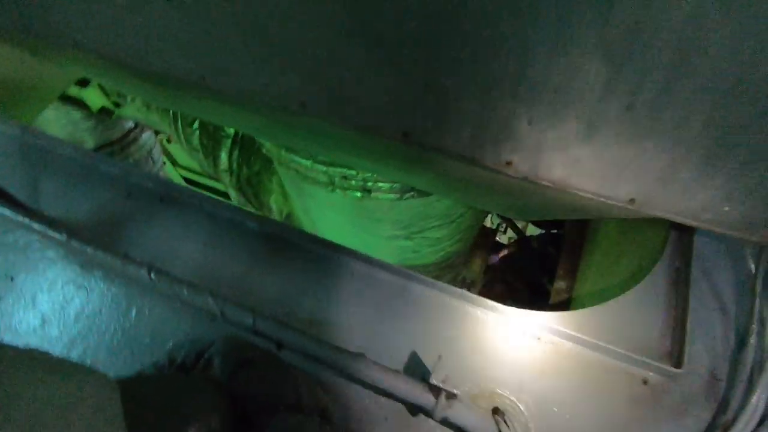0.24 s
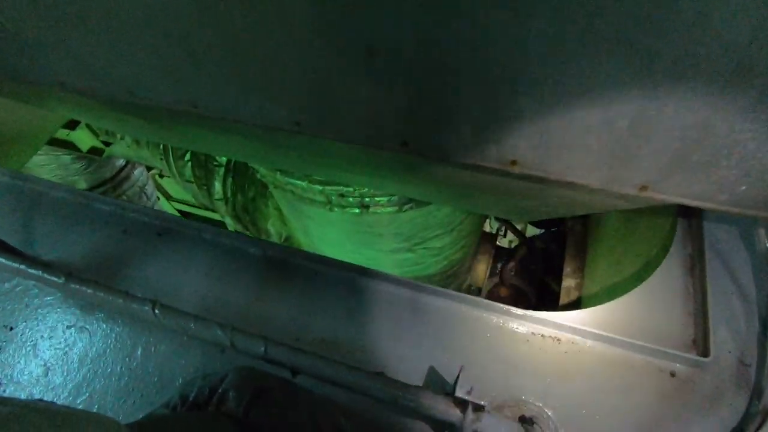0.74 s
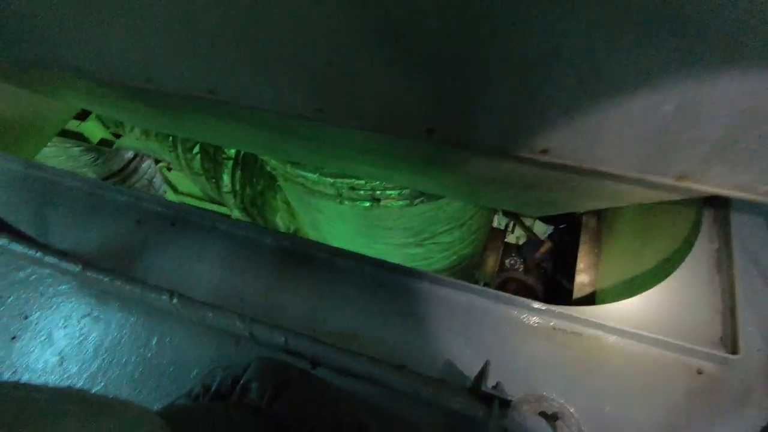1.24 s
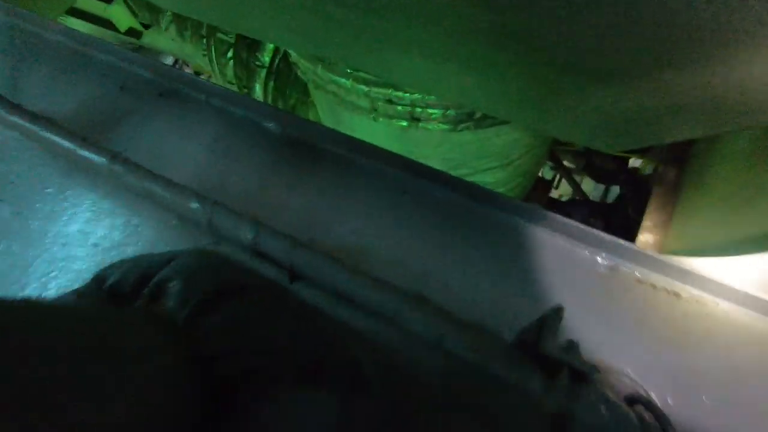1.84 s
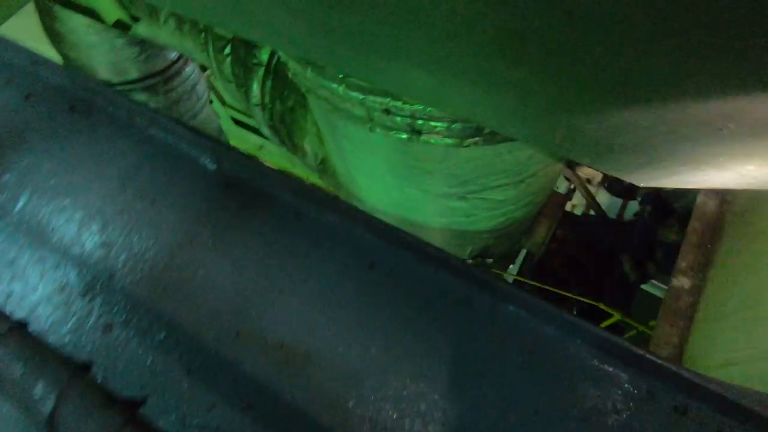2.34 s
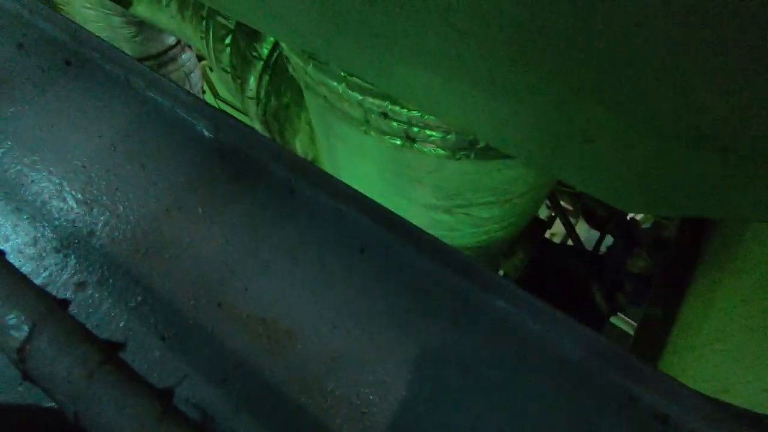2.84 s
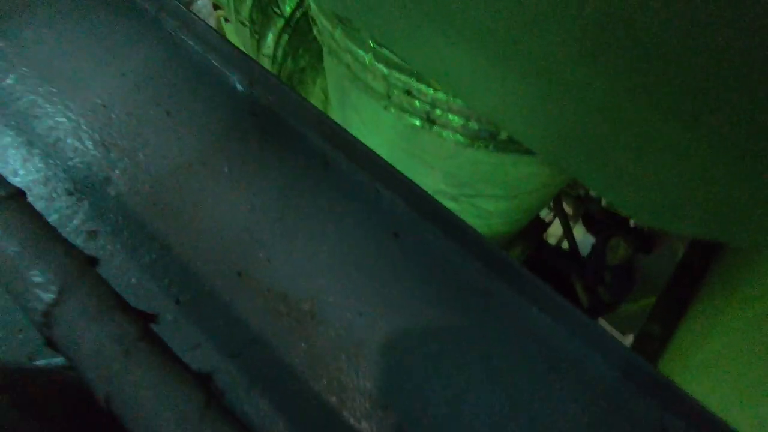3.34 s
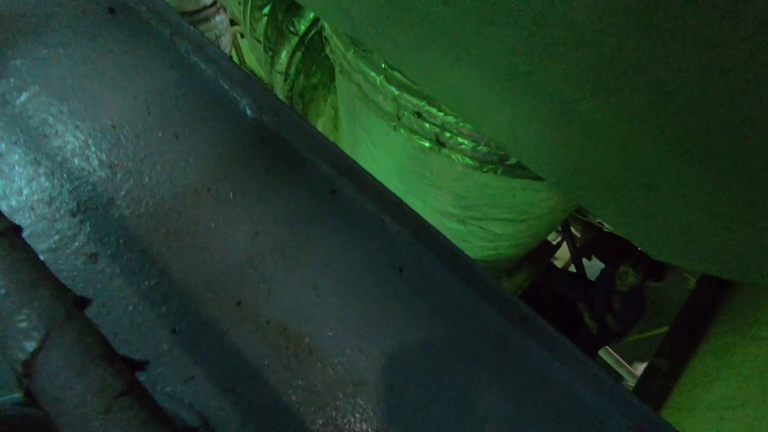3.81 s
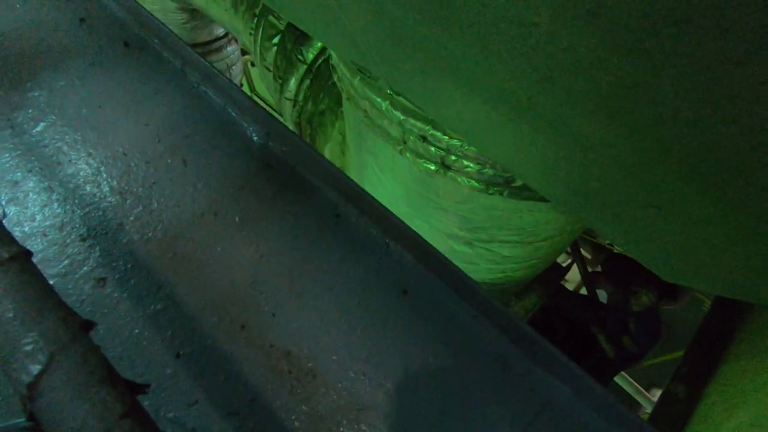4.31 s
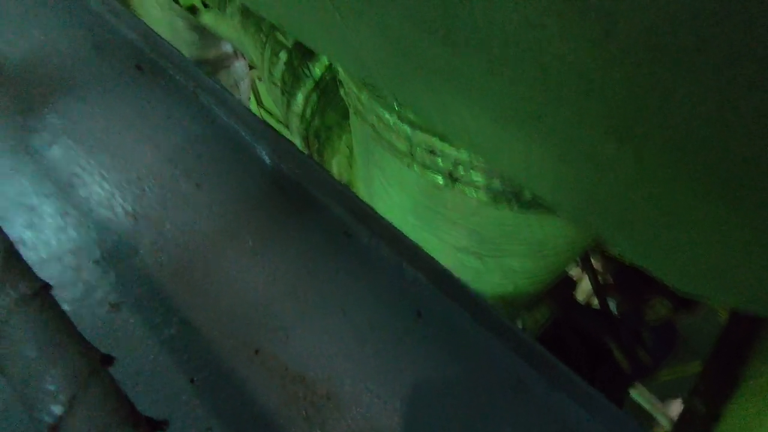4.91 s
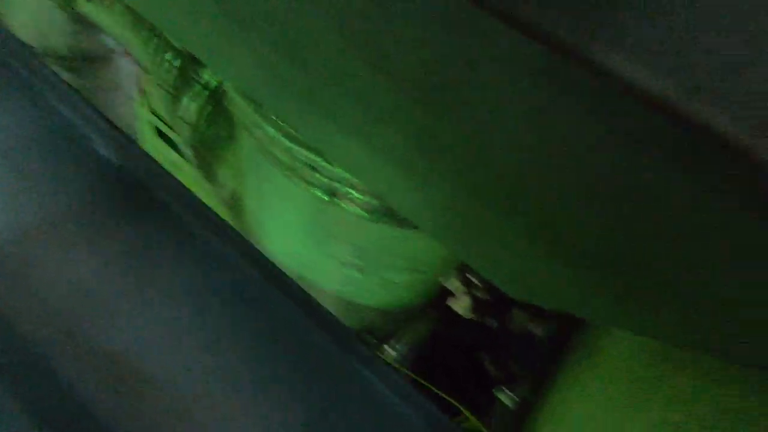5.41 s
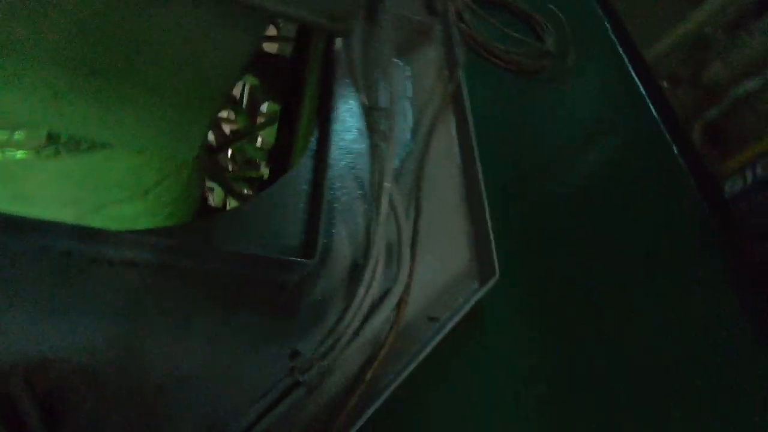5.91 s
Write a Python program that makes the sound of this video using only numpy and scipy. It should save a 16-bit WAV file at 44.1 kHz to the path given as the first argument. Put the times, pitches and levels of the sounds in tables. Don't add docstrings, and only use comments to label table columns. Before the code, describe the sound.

Loud continuous machinery roar and low throbbing hum, an electric whine coming and going, broken by small clicks at abrupt cuts.

```python
import sys
import numpy as np
from scipy import signal
from scipy.io import wavfile
from scipy.ndimage import uniform_filter1d

SR = 44100
rng = np.random.default_rng(int(sys.argv[2]) if len(sys.argv) > 2 else 0)


def nominal_scale(level):
    x = np.asarray(level, float) / 20
    return 10 ** x


def to_wav(s):
    ch = np.atleast_2d(s).T
    pcm = np.round(np.clip(ch, -1, 1) * 32767)
    wavfile.write(sys.argv[1], SR, pcm.astype(np.int16))


N = 271656

ENGINE_HZ, TWIN_LAG_HZ = 14.985, 0.15
SHAFT_HZ = 14.937
# order, level_db, twin_share, cancel_s
FIRING_PAIRS = [(3, -36.5, 0.8, 2.3), (4, -52.5, 3.2, 1.3), (6, -41.5, .9, 1.92), (12, -43.5, .7, 2.08)]
# order (multiple of the shaft speed), level_db
SHAFT_ORDERS = [(2, -53), (3.5, -51.5), (5, -54), (8.5, -44.5), (10.5, -48), (12.6, -47), (15, -48.5),
                (16, -49), (17, -50.5), (17.7, -50), (20, -55), (24, -51.5), (36, -56)]
PUMP_HZ = [316, 632.4, 1582.3, 1912, 2214, 2390, 2530, 3165, 3320]
# level_db, wander_db
PUMP_LEVELS = [(-49.5, 3), (-52.5, 2), (-62.5, 1), (-68.5, 2.5), (-69.5, 2), (-70.5, 2.5), (-72.5, 4.5),
               (-76.5, 1), (-70.5, -1.5)]
PUMP_FOLLOW = 2.2
# freq_hz, level_db (per Hz)
ROAR_SPECTRUM = [(12, -38), (20, -6.5), (53, -4), (126, -2), (200, -5.5), (408, -11.5), (484, -12.5),
                 (850, -18.5), (961, -18), (1030, -17.5), (1290, -22.5), (1570, -22), (3520, -33.5),
                 (6040, -39), (7000, -46.5), (9100, -70), (15400, -120)]
ROAR_DB = -32
# freq_hz, level_db (per Hz)
FIZZ_SPECTRUM = [(3500, -30), (6000, 1.5), (6500, 0), (8800, -19), (10500, -27.5), (11250, -34.5),
                 (11800, -22), (12400, -17), (13500, -15), (14000, -20.5), (14600, -14), (15200, -13.5),
                 (15700, -6), (15800, -35)]
FIZZ_DB, FIZZ_SHELTER_DB = -62, -5
# pitch_hz,
# level_db, offset_hz, partner_share, cancel_s
BOOM_PAIRS = [(119.5, -42, -2.3, .4, 2.0), (134.85, -37, -1.03, .55, 2.47)]
# nearest_order, pitch_hz
SPOT_TONES = [(7, 104.9), (13, 198.3)]

# time_s, sheltered (in the gap, 0-1), turned (to the motor, 0-1)
MIC_PATH = [(0, 0, 0.7), (.2, 0, 0.6), (.45, 0.1, 0), (.9, 0.1, 0), (1.35, 0.2, .3), (1.52, .35, 0.94),
            (1.85, .45, 0.9), (2.15, 0.7, 0.4), (2.9, 0.72, 0.2), (3.76, 1, 0.12), (5.88, 0.4, .8),
            (6.16, .1, 0.7)]
# order, start_s, rise_s, stay_s, level_db
LOUD_SPOTS = [(7, 1.95, .15, 5, -44), (7, 2.05, .15, 0.53, -46), (13, 0.23, .1, 0.39, -46),
              (13, 1.0, 0.13, .05, -40), (13, 2.226, 0.34, 0.37, -38.5), (13, 3.1, 0.13, .3, -42.5),
              (32, 1.6, 0.14, 2.0, -40), (32, 1.6, .12, .7, -51.5), (32, 5.95, .1, 1, -38),
              (40, 2.16, 0.36, 2, -50.5), (64, 0.044, .42, .1, -43.5), (64, 0.63, 0.14, 0.47, -51.5),
              (64, 1.66, 0.68, 0.31, -50), (64, 2.55, 0.74, 2, -45.5), (64, 5.8, .05, 0.062, -39.5),
              (64, 5.95, 0.19, 1, -45)]
LEAVE_S = 0.21
QUIET_DB = {7: -48, 13: -52, 32: -51.5, 40: -54.5, 64: -58.5}
TOP_AWAY_DB, TOP_TURN_DB, TOP_SHELTER_DB = -56.5, 10, -16
COLOUR_HZ = [350, 950, 1550, 4000]
SHELTER_DB = [-5, -1.5, -1, -2]
TURN_DB = [1.5, -3, 2, 1]
RISEN_DB = [-1.5, 3, 1, 0]
RISEN_S = 5.87
MIC_LOW_HZ = 38.4
# start_s, cut_s, source_s (taken from), fade_s, cut_height (wave height at the cut)
PIECES = [(0, 1.51639, 0, .0005, .022), (1.51639, 3.76639, 1.51639, .011, .028),
          (3.79639, 5.86639, 1.51639, .013, .047), (5.87639, 6.16, 5.87639, .003, .075)]


def engine():
    out = np.zeros(N)
    for order, db, share, cancel_s in FIRING_PAIRS:
        order = round(order)
        beating = beat(-order * TWIN_LAG_HZ, share, cancel_s)
        out += tone(order * ENGINE_HZ, db, 0.87, 0.36, 4.5, beating)
    for order, db in SHAFT_ORDERS:
        out += tone(order * SHAFT_HZ, db, 1.9, 0.5, 3.0)
    return out


def motor():
    sheltered, turned = curves(MIC_PATH, np.arange(N) / SR)
    top = nominal_scale(TOP_AWAY_DB + TOP_TURN_DB * turned + TOP_SHELTER_DB * sheltered)
    out = np.zeros(N)
    for order, height, flutter_db in [(32, heard(32), 0.51), (40, heard(40), 2.4),
                                      (64, heard(64), 1.8), (96, top, 1.1)]:
        out += tone(order * SHAFT_HZ, 0, flutter_db, 0.28, 16.0, height)
    return out


def pumps():
    bands = PUMP_FOLLOW * colour(np.arange(N) / SR)
    out = np.zeros(N)
    for hz, (db, wander_db) in zip(PUMP_HZ, PUMP_LEVELS):
        nearest = np.argmin(abs(np.log(hz / np.array(COLOUR_HZ))))
        out += tone(hz, db + bands[nearest], wander_db, 0.61, 4.0)
    return out


def deck():
    out = np.zeros(N)
    for hz, db, offset_hz, share, cancel_s in BOOM_PAIRS:
        out += tone(hz, db, 0.47, 0.44, 3.0, beat(offset_hz, share, cancel_s))
    for order, hz in SPOT_TONES:
        out += tone(hz, 0, 1.5, 0.37, 5.0, heard(order))
    return out


def roar():
    def field_db(t, hz):
        place = np.interp(np.log(hz + 1), np.log([150] + COLOUR_HZ), range(5))
        shares = np.clip(1 - abs(place[:, None] - np.arange(1, 5)), 0, 1)
        narrow = 0.88 * patches(t, hz, wide=3, long=40)
        broad = 0.5 * patches(t, hz, wide=25, long=10)
        return shares @ colour(t) + (narrow + broad) * np.clip(place, 0.3, 1)[:, None]
    swell = nominal_scale(ROAR_DB + 0.34 * drift(14.0))
    return swell * noise(ROAR_SPECTRUM, 2048, field_db)


def fizz():
    def field_db(t, hz):
        shelter_db = FIZZ_SHELTER_DB * curves(MIC_PATH, t)[0]
        blotches = 1.2 * patches(t, hz, wide=8, long=12)
        return shelter_db + blotches + 0.42 * patches(t, hz, wide=200, long=40)
    return nominal_scale(FIZZ_DB) * noise(FIZZ_SPECTRUM, 512, field_db)


def heard(order):
    t, out = np.arange(N) / SR, nominal_scale(QUIET_DB[order])
    for spot_order, start, rise, stay, db in LOUD_SPOTS:
        if round(spot_order) == order:
            enter = (t - start) / rise
            leave = 1 - (t - start - rise - stay) / LEAVE_S
            inside = np.clip(np.minimum(enter, leave), 0, 1)
            out = out + nominal_scale(db) * np.sin(np.pi / 2 * inside) ** 2
    return out


def colour(t):
    sheltered, turned = curves(MIC_PATH, t)
    gap_db = np.outer(SHELTER_DB, sheltered - 0.5)
    turn_db = np.outer(TURN_DB, turned - 0.3)
    return gap_db + turn_db + np.outer(RISEN_DB, t > RISEN_S)


def beat(offset_hz, share, cancel_s):
    return 1 - share * np.exp(2j * np.pi * offset_hz * (np.arange(N) / SR - cancel_s))


def tone(hz, db, wander_db, slip, rate_hz, shape=1):
    phase = 2 * np.pi * (hz * np.arange(N) / SR + rng.random()) + slip * drift(rate_hz)
    level = np.sqrt(2) * nominal_scale(db + wander_db * drift(rate_hz))
    return level * (shape * np.exp(1j * phase)).imag


def noise(points, size, field_db):
    hop, hz = size // 4, np.fft.rfftfreq(size, 1 / SR)
    t = np.arange(N // hop + 5) * hop / SR
    f, db = np.transpose(points)
    shape_db = np.interp(np.log(hz + 1), np.log(f + 1), db, left=-90, right=-90)
    real, imag = rng.standard_normal((len(t), len(hz), 2)).T
    z = (real + 1j * imag) * nominal_scale(shape_db[:, None] + field_db(t, hz))
    return evened(signal.istft(z, nperseg=size, noverlap=size - hop)[1][:N])


def patches(t, hz, wide, long):
    z = rng.standard_normal((len(t), len(hz))).T
    return evened(uniform_filter1d(uniform_filter1d(z, wide, 0), long, 1))


def drift(rate_hz):
    hz = np.geomspace(rate_hz / 6, rate_hz, 20)[:, None]
    t = np.arange(0, N + 512, 256) / SR
    waves = np.sin(2 * np.pi * (hz * t + rng.random((20, 1))))
    slow = (waves / np.sqrt(hz)).sum(0)
    return np.interp(np.arange(N) / SR, t, evened(slow))


def curves(rows, t):
    s, *columns = np.transpose(rows)
    return np.array([np.interp(t, s, c) for c in columns])


def evened(x):
    return x / np.sqrt(np.mean(x ** 2) + 1e-20)


def scene():
    return (engine() + motor() + pumps() + deck() + roar() + fizz())[None]


def starved(x, margin_db):
    hz, t, z = signal.stft(x, SR, nperseg=1024, noverlap=512)
    power = uniform_filter1d(abs(z) ** 2, size=4, axis=0)
    hiss = power[(hz > 10800) & (hz < 11300)]
    floor = np.median(hiss) * nominal_scale(2 * margin_db)
    z = z * ((power > floor) | (hz[:, None] < 7000))
    return signal.istft(z, SR, nperseg=1024, noverlap=512)[1][:len(x)]


def roll_off(x):
    return signal.sosfilt(signal.butter(12, 15870, fs=SR, output="sos"), x)


def record(dry):
    low_cut = signal.butter(3, MIC_LOW_HZ, "high", fs=SR, output="sos")
    x = starved(signal.sosfilt(low_cut, dry[0]), margin_db=0.0)
    out, x = np.zeros(N), np.pad(x, (300, 0), "reflect")
    for start, cut, source, fade, height in PIECES:
        first = round(start * SR)
        count = min(round(cut * SR), N) - first
        end = round(source * SR) + count
        end += np.argmin(abs(abs(x[end - 1:end + 299]) - height))
        fade_in = np.minimum(np.arange(count) / SR / fade, 1)
        out[first:first + count] = x[end - count:end] * fade_in
    return roll_off(out[None])


dry = scene()
out = record(dry)
to_wav(out)
```